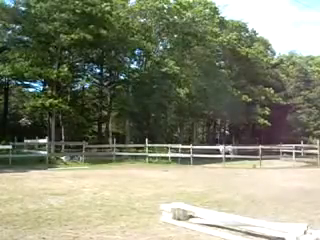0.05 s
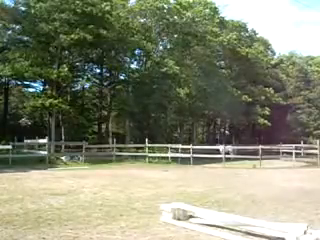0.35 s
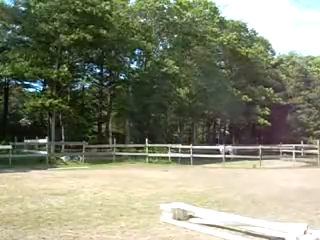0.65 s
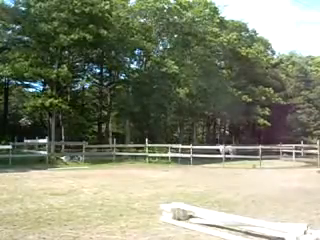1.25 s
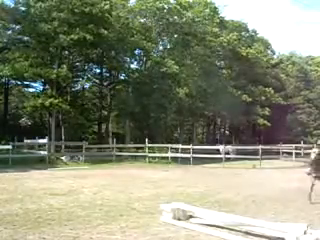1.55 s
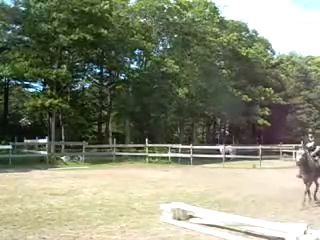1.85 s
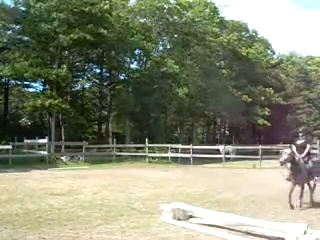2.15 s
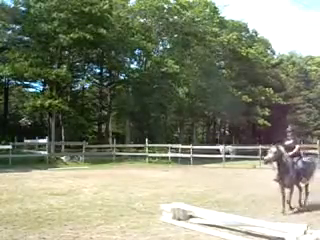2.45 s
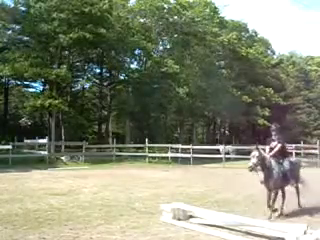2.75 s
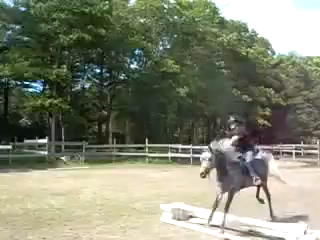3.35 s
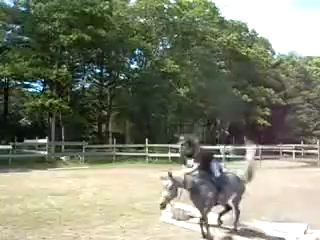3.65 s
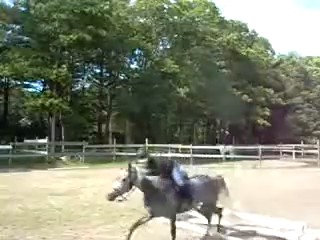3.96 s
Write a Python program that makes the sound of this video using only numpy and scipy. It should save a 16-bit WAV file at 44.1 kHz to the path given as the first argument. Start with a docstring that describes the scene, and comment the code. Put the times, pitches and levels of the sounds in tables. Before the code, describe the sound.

Soft hoof thuds of a cantering horse approach, then hooves knock sharply on a jump pole.

```python
"""Soft hoof thuds come first: a horse canters up a sandy outdoor arena towards a low jump of poles.
Each hoof pushes into the soft ground, which rumbles briefly. Close by, a sharp snap comes at take-off,
then the hooves knock a pole, making it ring, and spray sand on landing.
Behind it all are a few faint ticks, small birds and a steady wash of air in the trees."""
import sys
import numpy as np
from scipy import signal
from scipy.fft import irfft
from scipy.io import wavfile
from scipy.ndimage import uniform_filter1d

SR = 44100
rng = np.random.default_rng(int(sys.argv[2]) if len(sys.argv) > 2 else 0)


def wav_out(sig):
    """Save sig, one row per channel (or a flat mono array), as 16-bit PCM at SR to the path in sys.argv[1]."""
    wavfile.write(sys.argv[1], SR, np.round(np.clip(np.atleast_2d(sig).T, -1, 1) * 32767).astype(np.int16))


N = 176400  # 4 seconds

# A "decay" is the time to fade to about a third; a "t60" is the time to fade by 60 dB.
# A "tone" table says how strong low and high pitches are compared with each other.

# hoofbeats: t/s, thump level/dB, thump f/Hz, soil rumble level/dB, soil rumble decay/s # (the row at 3.776 s is
# a small extra knock on the pole, played here as a low thump)
HOOFBEATS = [(0.081, -67, 94, -51.5, 0.015), (0.106, -48, 73.6, -57, 0.02), (0.285, -53.5, 83, -61, 0.037),
             (0.532, -51, 95, -64, 0.038), (0.571, -51, 100, -76, 0.092), (0.7, -49.5, 139, -67, 0.017),
             (0.717, -50.5, 100, -59, 0.038), (.769, -47.5, 98, -53, 0.029),
             (0.849, -46.5, 113, -61, 0.029), (.852, -55, 650, -60, 0.018), (2.128, -52, 92, -44.5, 0.027),
             (2.156, -46, 131, -47.5, 0.04), (2.179, -46, 99, -57, 0.0084), (2.259, -40, 133, -55, 0.077),
             (2.3415, -34, 290, -46, .018), (2.3445, -37, 520, -50, .012), (2.373, -38, 170, -47, .015),
             (2.381, -34.5, 140, -47, .02), (2.389, -34.5, 130, -46, .02), (2.417, -34, 160, -43, .028),
             (2.423, -37, 220, -54, .01), (2.534, -44, 81.5, -56.5, 0.19), (2.678, -52, 128, -52.5, 0.038),
             (2.71, -48, 135, -47.5, 0.032), (2.747, -41.5, 150, -77, 0.14), (2.969, -42, 110, -50, .06),
             (3.063, -38, 135, -46.5, .025), (3.102, -44, 200, -51, .02), (3.147, -35, 140, -52, .018),
             (3.202, -45, 110, -44.5, 0.025), (3.240, -51, 198, -38, 0.012),
             (3.301, -37.5, 216, -51, 0.026), (3.463, -50, 107, -55.5, 0.16),
             (3.537, -39.5, 353, -50, 0.036), (3.589, -37.5, 242, -43, 0.011),
             (3.652, -50, 520, -51, 0.013), (3.724, -44, 330, -38, 0.019), (3.743, -30, 175, -42.5, 0.033),
             (3.7653, -20, 560, -39.5, 0.0048), (3.776, -30, 330, -50, .01),
             (3.7801, -24, 560, -45, 0.0071), (3.798, -28, 190, -37, 0.034), (3.885, -44, 240, -44, 0.034),
             (3.918, -53, 140, -38.5, 0.037), (3.955, -35, 201, -48, 0.041), (3.976, -36, 180, -51, 0.017),
             (3.994, -29.5, 215, -44, .03)]
# tone of the grit scuffed by a hoof: f/Hz, level/dB
GRIT_TONE = [(150, 16), (500, -8), (900, 11.5), (1800, 2), (3000, 0.5), (5600, 1.5), (9500, -19.5)]
# hooves hitting the pole: t/s, crack level/dB, rattle level/dB relative to the crack, crack top f/Hz,
# crack bottom f/Hz, clunk level/dB, ring level/dB, clack f/Hz, clack level/dB, clack t60/s
POLE_HITS = [(3.7085, -11, -3.5, 4040, 910, -36, -42.5, 1470, -31.5, 0.0079),
             (3.7642, -12, 4, 7250, 342, -4.5, -45, 2520, -30.5, 0.054),
             (3.7796, -8.5, -1, 5900, 170, -5, -31.5, 2384, -32.5, 0.063)]
# tone of the hard crack of hoof on pole: f/Hz, level/dB
CRACK_TONE = [(60, -34), (200, -21), (700, 7.5), (1400, 10), (1900, 4.5), (2600, 9), (3400, 9), (4100, 6.5),
              (5500, 4.5), (7300, 0), (9500, -7)]
# tone of the pole's hollow clunk: f/Hz, level/dB
CLUNK_TONE = [(25, -42), (70, -28), (140, -4), (300, 1), (500, 9), (660, 4), (820, 7), (1000, 5),
              (1500, -26.5), (3000, -33.5)]
# notes the struck pole rings at: f/Hz, relative level/dB, t60/s
POLE_NOTES = [(110, -3.5, 0.15), (153, -4.5, 0.13), (193, 3.5, 0.15), (281, -8, 0.28), (327, -7, 0.098),
              (466.6, 1.5, 0.21), (530, -19, 0.22), (591, -2, 0.19), (615, -12, 0.19), (730, -19, 0.097),
              (806, -10, 0.056), (873, -7.5, 0.078), (1011, -4, 0.079), (2413, -18, 0.08)]
# sharp snaps and faint ticks: t/s, level/dB, pitch multiplier, rattle level/dB relative to the snap # (the row
# at 3.25 s is an echo of the take-off snap at 3.219 s)
SNAP_EVENTS = [(.443, -44.5, 1.45, -4), (0.7236, -32, .62, -13), (.7242, -43.5, 1.22, -6),
               (1.1543, -33.5, 0.75, -5.5), (1.156, -37.5, 1.18, -3), (1.475, -42.5, 1.5, -4),
               (3.2191, 0.5, 0.98, -10), (3.2219, -21.5, 1.72, -9), (3.25, -25, 1.22, -4),
               (3.523, -37, 1.1, -6), (3.868, -30.5, .62, -8), (3.941, -29.5, 1.18, -5),
               (3.973, -21.5, 0.81, -6)]
# tone of a snap with a pitch multiplier of 1: f/Hz, level/dB
SNAP_TONE = [(30, -34), (200, -39), (900, -8.5), (1600, -17), (2100, -10), (2800, 5), (3800, 2),
             (5400, 6.5), (6500, -5), (8300, -9.5), (9800, -23), (14000, -29)]
# loudness of the sand kicked up at the jump: t/s, level/dB
SAND_LEVELS = [(3.3, -60.5), (3.5, -67), (3.62, -60), (3.692, -51), (3.74, -54), (3.82, -46), (3.86, -63),
               (3.925, -57.5), (3.956, -53.5), (3.97, -48), (4.0, -50)]
# tone of that sand: f/Hz, level/dB
SAND_TONE = [(30, -30), (150, 8), (500, 3), (1000, 0.5), (1800, 0), (2800, 0.5), (4000, -4), (5600, -7),
             (7500, -9.5), (9500, -28)]
# tone of the fine sand flung by the landing stride: f/Hz, level/dB
SPRAY_TONE = [(300, -23), (1800, -14), (3000, -0.5), (5600, 0), (7200, -5), (9500, -22)]
# loudness of the ground's rumble between hoofbeats: t/s, level/dB
RUMBLE_LEVELS = [(0, -60.5), (.2, -68.5), (.42, -73), (.55, -63), (.85, -65), (1.2, -71), (2.05, -73),
                 (2.2, -65), (2.42, -60), (2.851, -67.5), (3.1, -51), (3.4, -66), (3.65, -59), (3.79, -53),
                 (3.86, -55), (4.0, -47)]
# tone of that rumble: f/Hz, level/dB
RUMBLE_TONE = [(10, -12.5), (45, -2), (80, -3), (120, 0.5), (170, -8), (260, -19), (600, -50),
               (2000, -68.5)]
# bird notes: t/s, length/s, start f/Hz, end f/Hz, level/dB, echo level/dB relative to the note
BIRD_NOTES = [(.255, .02, 1950, 2150, -69, 0), (.300, .045, 2680, 2880, -63.5, -5),
              (.622, .035, 1820, 2100, -65, -4), (.661, .062, 2100, 2850, -59.5, -6),
              (.773, .012, 5600, 7600, -67, 4), (1.757, .012, 5450, 7600, -61, 2)]
# faint, dry pips after a bird's whistle: t/s, level/dB
PIPS = [(.786, -59), (.802, -62), (.817, -58), (.828, -62), (.838, -57), (.862, -63), (.882, -62)]
# tone of the air in the trees: f/Hz, level/dB
AIR_TONE = [(15, -64), (25, -36), (54, 3), (129, -16.5), (157, 1.5), (187, -8.5), (286, -7.5), (332, 0),
            (357, -8.5), (493, -4), (559, -5.5), (633, -3.5), (896, -5), (1150, -6.5), (2250, -12),
            (5780, -18.5), (9500, -32), (12400, -99), (20900, -120)]


def hooves(soil_rise_s=0.0045, soil_pitch_ratio=0.74, soil_octaves=1.276, grit_db=-36.5, grit_s=0.038):
    """Each hoof gives one low push; the soil rumbles briefly round it and a little grit is scuffed."""
    thuds, scuff_level = np.zeros(N), np.zeros(N)
    t = np.arange(-SR // 20, SR // 3) / SR  # the hoof lands at t = 0
    since_landing = np.maximum(t, 0)
    rise = np.exp(np.minimum(t, 0) / soil_rise_s)
    f = np.fft.rfftfreq(len(t), 1 / SR) + 1
    for at_s, db, hz, soil_db, decay_s in HOOFBEATS:
        u = (np.pi * hz * t) ** 2
        thump = (1 - 2 * u) * np.exp(-u)  # a single pulse, strongest at hz
        # the soil is a short burst of noise, pitched a little below the thump
        band = np.exp(-(np.log2(f / (hz * soil_pitch_ratio)) / soil_octaves) ** 2 / 2)
        envelope = rise * np.exp(-since_landing / decay_s)
        soil = irfft(band * np.exp(2j * np.pi * rng.random(len(f))), len(t)) * envelope
        soil *= np.linalg.norm(envelope) / np.linalg.norm(soil)
        add(thuds, at_s + t[0], amp(db) * thump + amp(soil_db) * soil)
        add(scuff_level, at_s + t[0], amp(db + grit_db) * rise * np.exp(-since_landing / grit_s))
    return thuds + with_tone(scuff_level * grains(spread_db=3), GRIT_TONE)


def pole_knocks():
    """Hooves clip the pole: each contact makes a crack, a pitched clack, a hollow clunk and a ring."""
    out, t = np.zeros(N), np.arange(SR // 2) / SR
    ring = sum((-1) ** k * fading_note(t, hz, db, t60) for k, (hz, db, t60) in enumerate(POLE_NOTES))
    for (at_s, crack_db, rattle_db, top_hz, bottom_hz,
         clunk_db, ring_db, clack_hz, clack_db, clack_t60) in POLE_HITS:
        clack = fading_note(t, clack_hz, clack_db, clack_t60)
        contact = echoing_click(rattle_db, near_s=0.0095, far_db=rattle_db - 8.5, far_s=0.2)
        crack = filtered(with_tone(contact, CRACK_TONE), top_hz, "low", order=5)
        crack = filtered(crack, bottom_hz, "high")
        crack = softened(crack, spread_s=0.0002, hz=2900)
        clunk = with_tone(echoing_click(near_db=-3, near_s=0.011, far_db=-14, far_s=0.069), CLUNK_TONE)
        body = filtered(amp(clunk_db) * clunk + amp(ring_db) * ring, bottom_hz / 2, "high")
        add(out, at_s, amp(crack_db) * crack + clack + body)
    return out


def snaps():
    """Dry, bright snaps, perhaps of the horse's gear or a riding crop, each with a brief rattle."""
    out = np.zeros(N)
    for at_s, db, pitch, rattle_db in SNAP_EVENTS:
        click = echoing_click(rattle_db, near_s=0.005, far_db=-18, far_s=0.025)
        tone = [(hz * pitch, level) for hz, level in SNAP_TONE]
        add(out, at_s, amp(db) * with_tone(click, tone))
    return softened(out, spread_s=0.00011, hz=5070)


def kicked_sand(clump_db=2.5, clump_s=0.0049):
    """Sand is thrown up and ploughed in clumps as the horse lands."""
    times, db = np.transpose(SAND_LEVELS)
    clumps = normalised(filtered(rng.standard_normal(N), 1 / (2 * clump_s), "low"))
    level_db = np.interp(np.arange(N) / SR, times, db, left=-120) + clump_db * clumps
    return with_tone(grains(spread_db=1) * amp(level_db), SAND_TONE)


def sand_spray(start_s=3.945, rise_s=0.044, level_db=-42):
    """Fine sand flung by the landing stride swells into a bright hiss."""
    swell = np.clip((np.arange(N) / SR - start_s) / rise_s, 0, 1)
    return amp(level_db) * with_tone(grains(spread_db=-3) * swell, SPRAY_TONE)


def ground_rumble():
    """The ground gives a dull rumble that swells with the strides."""
    times, db = np.transpose(RUMBLE_LEVELS)
    rumble = normalised(with_tone(rng.standard_normal(N), RUMBLE_TONE))
    return rumble * amp(np.interp(np.arange(N) / SR, times, db))


def birds(bend=1.5, waver_depth=0.006, waver_hz=160, flutter_db=1.5):
    """Small birds give thin, wavering upward whistles, echoed by the trees."""
    out = np.zeros(N)
    for at_s, length_s, start_hz, end_hz, db, echo_db in BIRD_NOTES:
        progress = np.linspace(0, 1, int(length_s * SR))
        wobbles = normalised(filtered(rng.standard_normal((2, SR)), waver_hz, "low"))
        waver, flutter = wobbles[:, -len(progress):]  # one for pitch, one for loudness
        glide_hz = end_hz + (start_hz - end_hz) * (1 - progress) ** bend
        hz = glide_hz * (1 + waver_depth * waver)
        envelope = amp(db + flutter_db * flutter) * np.sqrt(abs(np.sin(np.pi * progress)))
        note = envelope * np.sin(2 * np.pi * np.cumsum(hz) / SR)
        echoes = echoing_click(near_db=-6, near_s=0.008, far_db=echo_db, far_s=0.06)
        add(out, at_s, signal.fftconvolve(note, echoes))
    return out


def chatter(centre_hz=2330, rise_s=0.0013):
    """A quick run of faint pips, each at a slightly different pitch."""
    out, t = np.zeros(N), np.arange(SR // 20) / SR
    envelope = t / rise_s * np.exp(1 - t / rise_s)
    for at_s, db in PIPS:
        hz = centre_hz * rng.uniform(0.92, 1.08)
        add(out, at_s, amp(db) * envelope * np.sin(2 * np.pi * hz * t))
    return out


def air_in_trees(level_db=-60.5, patchy_db=1.1):
    """Air in the trees makes a steady wash, with patches that drift slightly louder and softer."""
    hz, _, spectrum = signal.stft(rng.standard_normal(N), SR, nperseg=2048, noverlap=1536)
    patches = uniform_filter1d(rng.standard_normal(spectrum.shape), size=14, axis=0)  # blur over pitch
    patches = normalised(uniform_filter1d(patches, size=10, axis=1))  # blur over time
    f, db = np.transpose(AIR_TONE)
    tone_db = np.interp(np.log(hz + 1), np.log(f + 1), db)
    spectrum *= amp(tone_db[:, None] + patchy_db * patches)
    _, wash = signal.istft(spectrum, SR, nperseg=2048, noverlap=1536)
    return amp(level_db) * normalised(wash[:N])


def fading_note(t, hz, db, t60):
    """One pure note of a struck object, dying away."""
    return amp(db - 60 * t / t60) * np.sin(2 * np.pi * hz * t)


def grains(spread_db):
    """Grains of sand: a dense stream of tiny clicks of uneven size."""
    size = amp(spread_db * np.minimum(rng.exponential(1, N), 4))
    return normalised(rng.standard_normal(N) * size * (rng.random(N) < 0.2))


def echoing_click(near_db, near_s, far_db, far_s):
    """A click, then a quick rattle (near) and the longer echo of the arena (far)."""
    out = amp(near_db) * reflections(near_s) + amp(far_db) * reflections(far_s)
    out[0] += 1  # the click itself
    return out


def reflections(decay_s, rise_s=0.0014):
    """Half a second of dying echoes, with a total energy of 1."""
    t = np.arange(SR // 2) / SR
    tail = rng.standard_normal(len(t)) * np.exp(-t / decay_s) * (1 - np.exp(-t / rise_s))
    return tail / np.linalg.norm(tail)


def with_tone(x, tone, size=8192):
    """Shapes a sound's lows and highs to follow a tone table, using a filter with an energy of 1."""
    f, db = np.transpose(tone)
    hz = abs(np.fft.fftfreq(size, 1 / SR)) + 1
    log_gain = np.log(amp(np.interp(np.log(hz), np.log(f), db)))
    response = np.exp(np.conj(signal.hilbert(log_gain)))  # so nothing rings ahead of a click
    taps = np.fft.ifft(response).real[:size // 2]
    return signal.fftconvolve(x, taps / np.linalg.norm(taps))[:len(x)]


def softened(x, spread_s, hz):
    """Smears a click over a few cycles round hz without making it duller or brighter."""
    r = np.exp(-1 / (spread_s * SR))
    feedback = [1, -2 * r * np.cos(2 * np.pi * hz / SR), r * r]
    return signal.lfilter(feedback[::-1], feedback, x)


def filtered(x, hz, kind, order=2):
    """Keeps what lies below hz ("low") or above it ("high")."""
    return signal.sosfilt(signal.butter(order, min(hz, SR / 3), kind, fs=SR, output="sos"), x)


def amp(db):
    """Turns decibels into a number to multiply by."""
    return 10 ** (np.asarray(db) / 20)


def normalised(x):
    """Scales a signal to an average strength (rms) of 1."""
    return x / np.sqrt(np.mean(x ** 2) + 1e-20)


def add(mix, at_s, sound):
    """Mixes a sound in, starting at at_s seconds."""
    part = mix[max(round(at_s * SR), 0):][:len(sound)]
    part += sound[:len(part)]


def scene():
    """The horse and its surroundings, together in one channel."""
    horse = hooves() + snaps() + pole_knocks() + kicked_sand() + sand_spray()
    background = birds() + chatter() + air_in_trees() + ground_rumble()
    return (horse + background)[None]


def record(dry, top_hz=9750):
    """The recorder cuts off the highest treble."""
    low_pass = signal.firwin(511, top_hz, window=("kaiser", 9), fs=SR)
    return signal.oaconvolve(dry, low_pass[None], "same")


dry = scene()
out = record(dry)
wav_out(out)
```